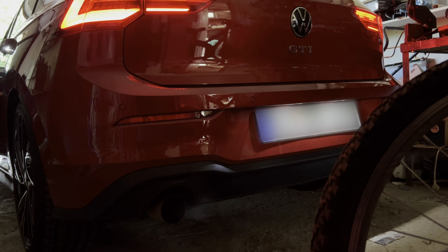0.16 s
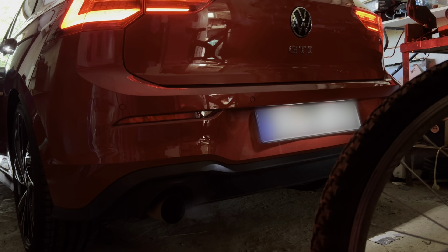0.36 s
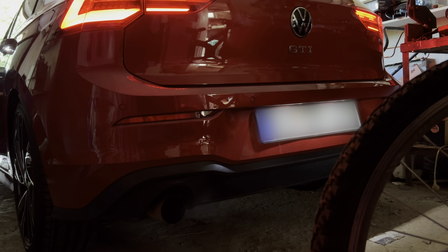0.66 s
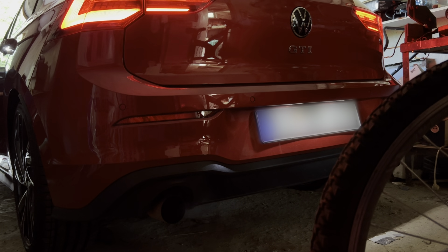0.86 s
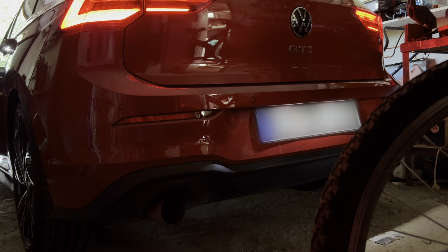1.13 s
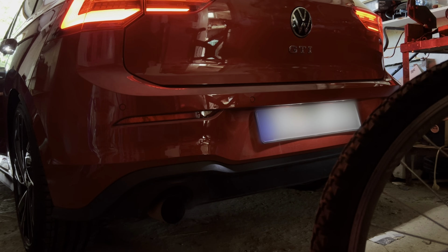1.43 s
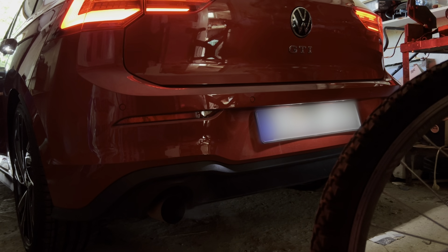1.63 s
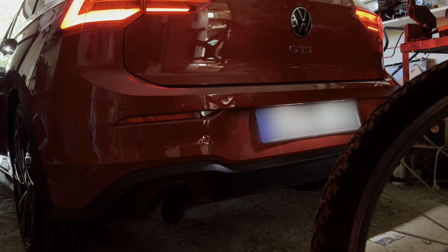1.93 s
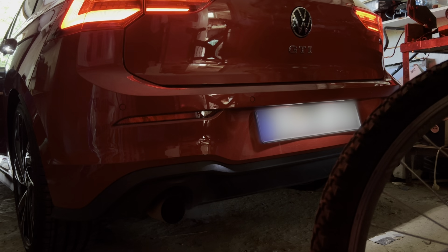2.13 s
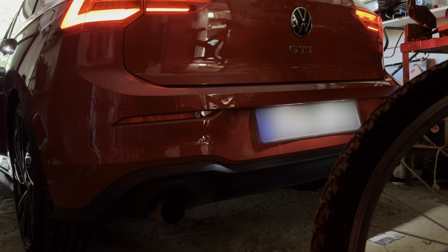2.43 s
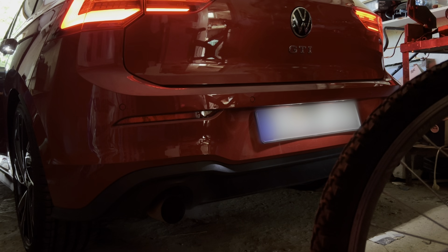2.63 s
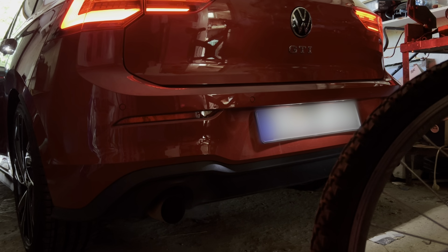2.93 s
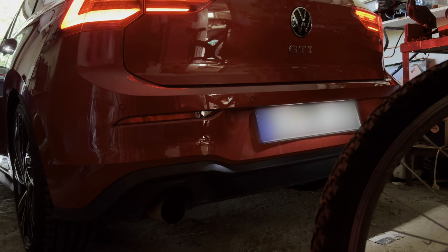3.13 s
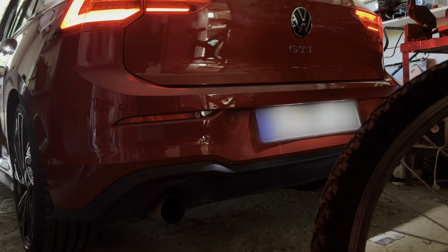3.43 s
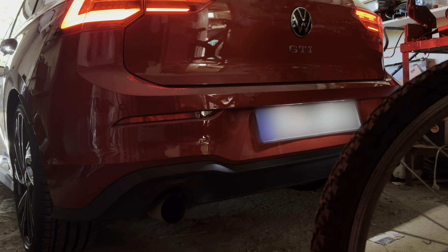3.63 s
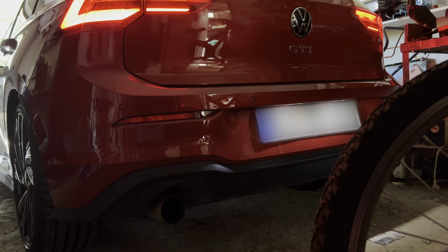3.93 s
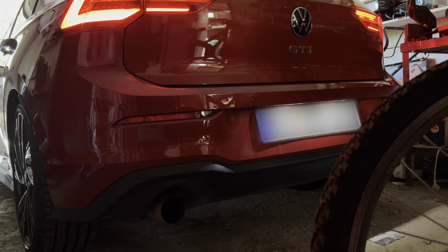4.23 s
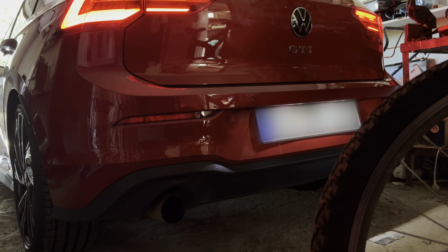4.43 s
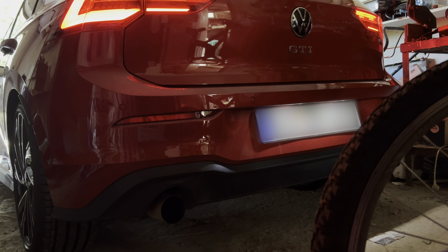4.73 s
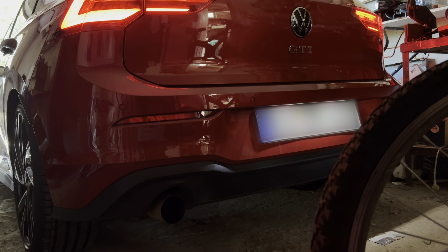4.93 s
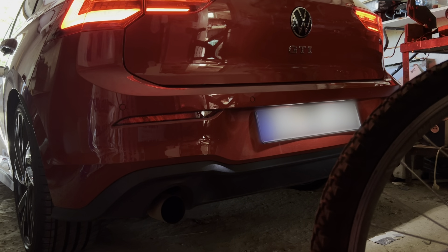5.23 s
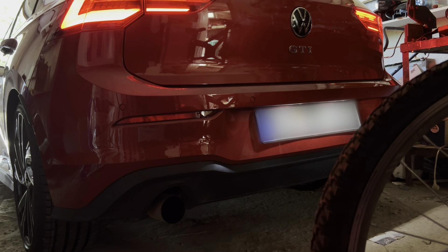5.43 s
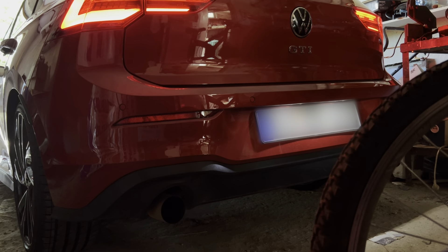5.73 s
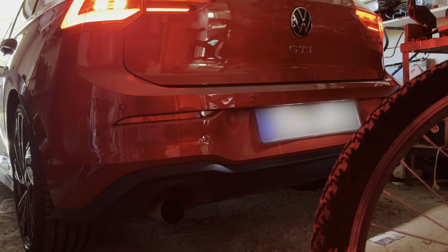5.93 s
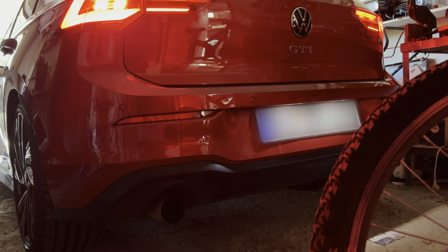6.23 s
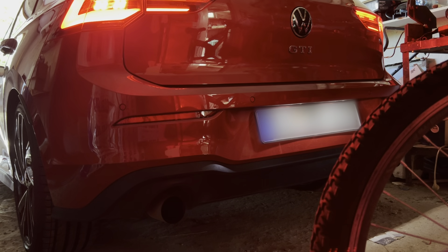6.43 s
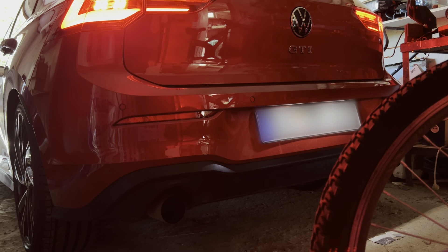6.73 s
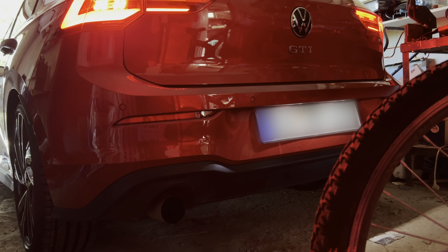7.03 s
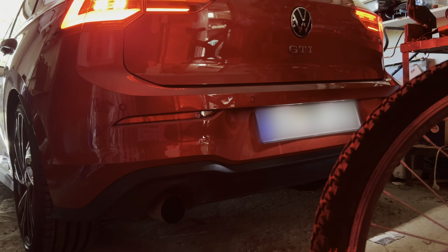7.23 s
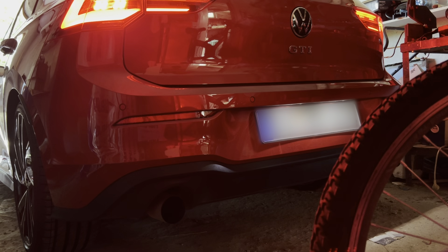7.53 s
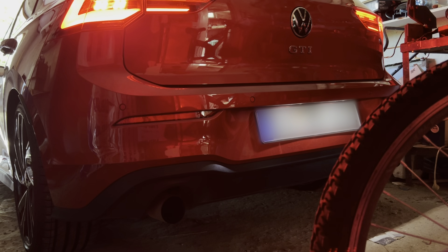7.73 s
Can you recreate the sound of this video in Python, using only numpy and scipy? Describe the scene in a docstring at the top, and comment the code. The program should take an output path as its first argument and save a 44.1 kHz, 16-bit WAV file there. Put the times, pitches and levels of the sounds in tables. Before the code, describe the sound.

A turbocharged car engine idles loudly and boomily at the tailpipe in a workshop, a door slams, then the exhaust note softens in two steps.

```python
"""A turbocharged four-cylinder engine at its fast cold idle in a workshop, heard in stereo from behind the tailpipe.
Every firing sends a pulse down the exhaust, which booms low and barks higher up; gas rushes in the silencer.
Hiss and whines of the engine bay come from around the room; a thin whistle builds up while the valves are open.
A car door is slammed: filtered noise for latch and panel, decaying sines for its low ring and the cabin air.
Then the exhaust valves close in two steps, with a flick back between them, and the note turns softer."""
import sys
import numpy as np
from scipy import signal
from scipy.fft import rfft, irfft, next_fast_len
from scipy.io import wavfile

SR = 44100
rng = np.random.default_rng(int(sys.argv[2]) if len(sys.argv) > 2 else 0)


def digitize_waveform(pressure):
    """Quantize a signal to 16-bit integers and store it at the path in sys.argv[1].

    Rows of a 2-D input are taken as channels; values are limited to [-1, 1].
    """
    field = np.atleast_2d(pressure).T
    bounded = np.clip(field, -1, 1)
    quanta = np.round(bounded * 32767).astype(np.int16)
    wavfile.write(sys.argv[1], SR, quanta)


N = 346626
T = np.arange(N) / SR  # time of each sample, s
SIZE = next_fast_len(N + SR)  # transform length, with room for tails
HZ = np.maximum(np.arange(SIZE // 2 + 1) * SR / SIZE, 1)  # frequency of each bin, kept above 0


def from_db(db):
    """Decibels to gain."""
    return 10 ** (np.asarray(db) / 20)


def rms_one(x):
    """Scale to unit rms."""
    return x / np.sqrt(np.mean(x ** 2) + 1e-20)


def in_time(rows):
    """Each column of a curve at every sample."""
    s, *columns = np.transpose(rows)
    return [np.interp(T, s, column) for column in columns]


def over_hz(points, axis=1):
    """One column of a table, joined by straight lines on a log-frequency axis."""
    columns = np.transpose(points)
    return np.interp(np.log(HZ), np.log(columns[0]), columns[axis])


def through(x, response):
    """Filter by a frequency response."""
    return irfft(rfft(x, SIZE) * response, SIZE)[..., :N]


def causal(gain):
    """The minimum-phase response with this gain: it rings only after it is struck."""
    cepstrum = irfft(np.log(gain), SIZE)
    cepstrum[1:SIZE // 2] *= 2
    cepstrum[SIZE // 2 + 1:] = 0
    return np.exp(rfft(cepstrum))


def resonance(hz, width_hz):
    """Response of one resonance, gain 1 on top."""
    return 1 / (1 + 1j * (HZ ** 2 - hz ** 2) / (HZ * width_hz))


def drift(step_s):
    """A slow random wander: normal draws of spread 1, joined by straight lines."""
    knots = np.arange(0, T[-1] + 1, step_s)
    return np.interp(T, knots, rng.standard_normal(len(knots)))


def whine(hz, waver_hz):
    """A stereo tone of rms 1 whose pitch wavers quickly, so that it blurs into a narrow band."""
    knots = np.arange(0, T[-1] + 1, .012)
    waver = np.array([np.interp(T, knots, side) for side in rng.standard_normal((2, len(knots)))])
    phase = 2 * np.pi * np.cumsum(hz + waver_hz * waver, axis=1) / SR
    return np.sqrt(2) * np.sin(phase)


def diffuse(gain):
    """Stereo noise as it arrives from all round the room; gain per root Hz."""
    # likeness of the two microphones, before clipping: (frequency [Hz], correlation [1])
    likeness = [(100, 1), (240, 0.94), (450, 0.96), (770, -0.15), (1170, 0.77), (1800, -0.014),
                (4200, 0.24), (5200, 0.21), (6600, 0.6), (8200, .2), (9300, -0.64), (10200, -1.22),
                (11400, -0.18), (12600, 0.89), (15500, .5)]
    alike = np.clip(over_hz(likeness), -.99, .99)
    mid, side = rng.standard_normal((2, N)) * np.sqrt(SR) / 2
    common = through(mid, gain * np.sqrt(1 + alike))
    opposed = through(side, gain * np.sqrt(1 - alike))
    return common + opposed * [[1], [-1]]


def at_microphones(x):
    """Standing waves of the room give the left microphone its own level and lag against the right."""
    # left against right: (frequency [Hz], level [dB], lag [rad])
    left_port = [(42, 2, 0.64), (85, -2.13, 0.21), (167, -0.1, 0.41), (290, 2, 1.1), (422, -1.5, 0.62),
                 (553, -9.5, 0.075), (580, -6, 1.3), (990, -1.5, 2.04), (1110, -13, 0.41)]
    left = from_db(over_hz(left_port, axis=1)) * np.exp(-1j * over_hz(left_port, axis=2))
    return np.array([through(x, left), x])


def workshop(x, t60, wet_db):
    """Direct sound plus dense reflections from floor and walls, different at each microphone."""
    tail = rng.standard_normal((2, SR // 2)) * from_db(-60 * T[:SR // 2] / t60)
    tail /= np.sqrt(np.sum(tail ** 2, axis=1, keepdims=True))
    return x + from_db(wet_db) * through(x, rfft(tail, SIZE))


def firings():
    """Sample at which each firing leaves the engine, counted off its wandering speed."""
    # engine speed: (time [s], firing rate [1/s])
    speed = [(0.0, 43.36), (0.42, 42.84), (1.12, 43.43), (1.39, 43.02), (1.77, 43.85), (2.33, 43.14),
             (2.77, 43.72), (2.92, 42.81), (3.07, 43.36), (4.19, 43.05), (5.03, 43.38), (5.6, 42.5),
             (6.08, 42.63), (6.16, 41.95), (6.61, 42.79), (7.2, 42.46), (7.37, 43.53), (7.86, 42.74)]
    start_turn = .267  # part of a firing interval already past at the start
    turns = start_turn + np.cumsum(in_time(speed)[0]) / SR
    return np.flatnonzero(np.diff(np.floor(turns)) > 0)


def pulses(at, scatter_db, jitter_s):
    """One pulse a firing; unequal runners make the cylinders limp, and no two burns are alike."""
    # the four cylinders in firing order: (strength [dB], lateness [s])
    cylinders = [(.2, .00012), (.3, -.00009), (-.2, .00009), (-.3, -.00012)]
    strength, lateness = rng.standard_normal((2, len(at)))
    own_db, own_s = np.resize(cylinders, (len(at), 2)).T
    when = np.clip(at + (own_s + lateness * jitter_s) * SR, 0, N - 1).astype(int)
    train = np.zeros(N)
    train[when] = from_db(own_db + scatter_db * strength)
    return train


def pipe(orders, low_hz, high_hz):
    """Response of the exhaust system, falling steeply beyond both ends."""
    idle_hz = 43.1  # the firing rate that the orders are multiples of
    multiple, db = np.transpose(orders)
    skirts = 1 / np.sqrt((1 + (low_hz / HZ) ** 12) * (1 + (HZ / high_hz) ** 12))
    return causal(from_db(np.interp(HZ / idle_hz, multiple, db)) * skirts + 1e-5)


def boom(at, opening, open_scatter_db, shut_scatter_db, jitter_s, lead_rad):
    """Firing pulses ring the exhaust; the valves hand the gas over from the straight path to the silenced one."""
    # exhaust response with the valves shut, half shut and open: (multiple of idle firing rate [1], level [dB])
    pipe_shut = [(1, -15.5), (2, 4), (3, -3.5), (4, -8), (5, -22), (6, -27.5), (7, -31.5), (8, -31),
                 (9, -9.5), (10, -29.5), (11, -38), (13, -50.5), (14, -38.5), (16, -50.5)]
    pipe_half = [(1, -19), (2, 1), (3, -5.5), (4, -11.5), (5, -35), (6, -25), (7, -26), (8, -31), (9, -15),
                 (10, -14.5), (11, -26), (12, -39), (13, -42.5), (14, -30), (16, -46.5)]
    pipe_open = [(1, -22.5), (2, 2.5), (3, 1.5), (4, -15.5), (5, -39), (6, -28), (7, -30.5), (8, -29.5),
                 (9, -18), (10, -14.5), (11, -21.5), (12, -42), (13, -49), (14, -22.5), (15, -24.5),
                 (16, -36.5)]
    scatter_db = shut_scatter_db + (open_scatter_db - shut_scatter_db) * opening[at]
    train = pulses(at, scatter_db, jitter_s)
    mouth = -np.exp(1j * lead_rad)  # pressure radiated by an open pipe end leads the flow
    out = 0
    for k, orders in enumerate([pipe_shut, pipe_half, pipe_open]):
        share = np.maximum(1 - np.abs(2 * opening - k), 0)  # crossfade between neighbouring stages
        out = out + share * rms_one(through(train, mouth * pipe(orders, low_hz=37.3, high_hz=714)))
    return at_microphones(out)


def bark(at, scatter_db, hard_db, jitter_s, delay_s, puff_db, top_hz):
    """Each pulse front, with a short turbulent puff behind it, strikes the tailpipe's upper resonances."""
    # upper resonances of the tailpipe: (frequency [Hz], width [Hz], level [dB])
    tailpipe = [(862, 28, 0), (902, 20, 1), (970, 60, -4), (1080, 30, 0), (1135, 70, 0), (1255, 30, -6),
                (1360, 70, -5)]
    hard = rng.random(len(at)) < .13  # share of burns that are harder and crack in the tailpipe
    hard_gain = np.interp(np.arange(N), at, from_db(hard_db * hard))
    front = pulses(at + delay_s * SR, scatter_db, jitter_s) * hard_gain

    puff_decay_s = .005
    puff_envelope = signal.lfilter([1], [1, -np.exp(-1 / (puff_decay_s * SR))], front)
    puff = workshop(rms_one(puff_envelope * rng.standard_normal(N)), t60=.2, wet_db=3)

    power = sum(np.abs(from_db(db) * resonance(hz, width)) ** 2 for hz, width, db in tailpipe)
    skirts = 1 / np.sqrt((1 + (590 / HZ) ** 24) * (1 + (HZ / top_hz) ** 20))
    gas = at_microphones(rms_one(front)) + from_db(puff_db) * rms_one(puff)
    return rms_one(through(gas, causal(np.sqrt(power) * skirts + 1e-5)))


def gas_flow(opening):
    """Turbulence in the silencer, coloured by the path that the valves leave open."""
    # turbulent gas: (frequency [Hz], valves shut [dB per Hz], valves open [dB per Hz])
    rumble = [(26, -77.5, -75.5), (40, -66.5, -64), (59, -50.5, -58.5), (85, -46, -44), (115, -41, -48.5),
              (175, -55, -44.5), (193, -69, -64), (227, -56, -50.5), (309, -74, -65), (363, -75, -48.5),
              (417.5, -63, -49), (455, -64.5, -60.5), (610, -96.5, -69.5), (915, -100, -100)]
    shut = diffuse(from_db(over_hz(rumble, axis=1)))
    wide = diffuse(from_db(over_hz(rumble, axis=2)))
    return np.sqrt(1 - opening) * shut + np.sqrt(opening) * wide


def engine_bay():
    """Broad hiss of belts, fans and intake, with steady whines of the ancillaries in it."""
    # hiss from around the room: (frequency [Hz], level [dB per Hz])
    bay = [(200, -96.5), (520, -70.5), (740, -68), (900, -71), (1150, -75), (1600, -78.5), (2250, -78.5),
           (3400, -87), (4800, -86), (5900, -95), (7600, -90), (9600, -91), (12000, -102.5), (15500, -116)]
    # ancillary whines: (frequency [Hz], rms level [dB])
    whines = [(1130, -49), (2089, -79), (2218, -64), (4266, -70), (4770, -71), (7680, -76)]
    tones = sum(from_db(db) * whine(hz, waver_hz=15.85) for hz, db in whines)
    return diffuse(from_db(over_hz(bay))) + tones


def whistle(opening, wander_hz, swell_db):
    """Gas whistles past the open valves: a thin tone, wandering in pitch and strength, that dies as they close."""
    level_db, shut_loss_db, build_s = -60, 40, 1.4
    hz = 3545 + wander_hz * drift(.7)
    swell = swell_db * drift(.3)
    build_up = np.minimum(T / build_s, 1)
    gain = from_db(level_db - shut_loss_db * (1 - opening) + swell) * build_up
    return gain * whine(hz, waver_hz=1.62)[0]  # same tone at both microphones


def door(rise_s):
    """The latch clacks and the panel rattles as noise bursts that die away in the room; ring and thuds join."""
    # latch first, panel after: (time [s], level before the rise [dB], low edge [Hz], high edge [Hz], t60 [s])
    door_bursts = [(3.486, -28, 590, 2640, 0.36), (3.491, -32, 2020, 8300, 0.17),
                   (3.499, -22, 300, 1190, 0.22), (3.525, -10.5, 114, 238, 0.32)]
    out, noise = 0, diffuse(1)
    for s, db, low_hz, high_hz, t60 in door_bursts:
        age = np.maximum(T - s, 0)
        band = signal.butter(2, [low_hz, min(high_hz, SR / 2 - 1)], "band", fs=SR, output="sos")
        envelope = from_db(db - 60 * age / t60) * (1 - np.exp(-age / rise_s))
        out = out + rms_one(signal.sosfilt(band, noise)) * envelope
    return out + door_ring(swell_s=0.0074) + thuds()


def door_ring(swell_s):
    """The door hits its frame, which sets its low modes ringing as decaying sines."""
    # low modes: (frequency [Hz], peak level before the swell [dB], t60 [s])
    door_modes = [(73, -4.5, 0.61), (87, -3.5, 0.22), (97.2, -5.5, 0.28), (159.6, -5.5, .49)]
    slam_s = 3.5106
    age = np.maximum(T - slam_s, 0)
    modes = sum(from_db(db - 60 * age / t60) * np.sin(2 * np.pi * hz * age) for hz, db, t60 in door_modes)
    return modes * (1 - np.exp(-age / swell_s))


def thuds():
    """Deep decaying swings of the air shut in the cabin behind the slammed door."""
    # cabin air: (time [s], frequency [Hz], starting peak level [dB], t60 [s])
    air_swings = [(3.531, 51, -23, 0.35), (3.608, 49.8, -9, 0.22), (3.715, 37.5, -20, 0.41)]
    out = 0
    for s, hz, db, t60 in air_swings:
        age = np.maximum(T - s, 0)
        out = out + from_db(db - 60 * np.minimum(age / t60, 2)) * np.sin(2 * np.pi * hz * age)
    return out


def scene():
    """Exhaust close by, its loudness set by the valves; engine bay and door beyond it."""
    # exhaust valves close halfway, flick back, shut, then ease a little: (time [s], opening [0-1])
    valves = [(4.2, 0.92), (4.28, 0.43), (5.05, 0.46), (5.2, 0.71), (5.3, .2), (5.39, 0.03), (6.3, 0.12),
              (6.7, 0.1), (7.86, 0.17)]
    # exhaust loudness from shut to open: (opening [0-1], boom [dB], bark [dB])
    loudness = [(0, -16, -64.5), (.55, -11.5, -39), (1, -5.5, -33)]
    opening, at = np.clip(in_time(valves)[0], 0, 1), firings()
    stages, boom_db, bark_db = np.transpose(loudness)
    boom_gain = np.interp(opening, stages, from_db(boom_db))
    bark_gain = np.interp(opening, stages, from_db(bark_db))
    low = boom_gain * boom(at, opening, open_scatter_db=0.53, shut_scatter_db=-0.13,
                           jitter_s=.00004, lead_rad=0.15)
    rasp = bark_gain * bark(at, scatter_db=.9, hard_db=2.2, jitter_s=.00005,
                            delay_s=.0003, puff_db=-.3, top_hz=1450)
    exhaust = low + rasp + gas_flow(opening) + whistle(opening, wander_hz=6.9, swell_db=1.8)
    return exhaust + engine_bay() + door(rise_s=0.0015)


def record(dry):
    """The highest peaks are rounded off at full scale; the deepest rumble and the top are cut."""
    low_cut_hz, top_cut_hz = 18, 15750
    rounded = dry / (1 + np.abs(dry) ** 16) ** (1 / 16)
    return through(rounded, 1 / np.sqrt((1 + (low_cut_hz / HZ) ** 8) * (1 + (HZ / top_cut_hz) ** 400)))


dry = scene()
out = record(dry)
digitize_waveform(out)
```